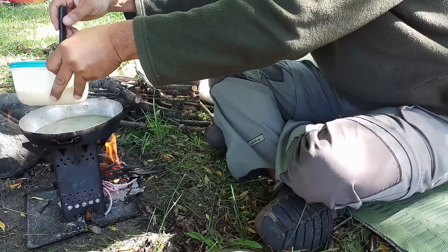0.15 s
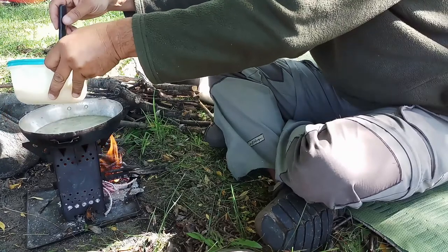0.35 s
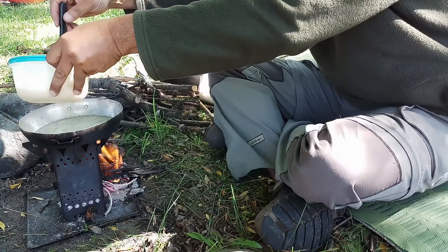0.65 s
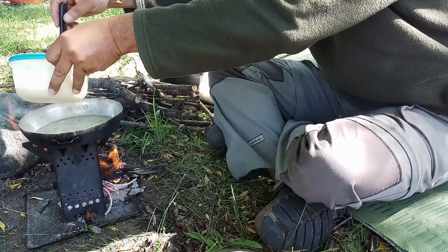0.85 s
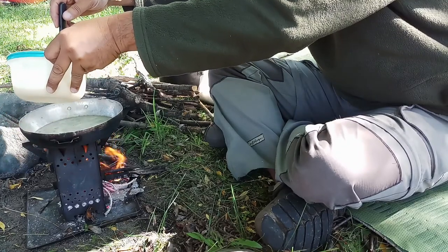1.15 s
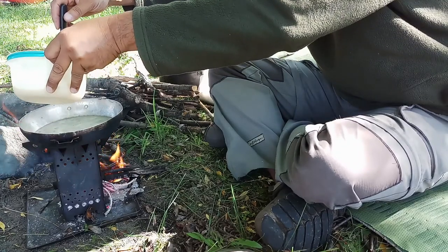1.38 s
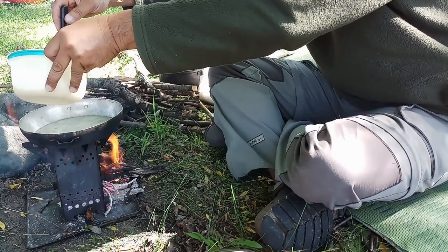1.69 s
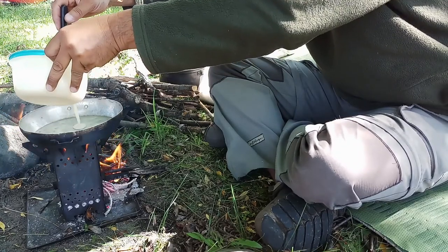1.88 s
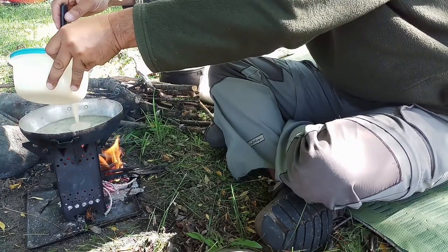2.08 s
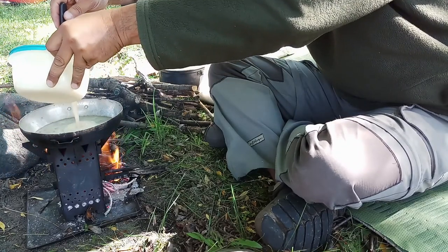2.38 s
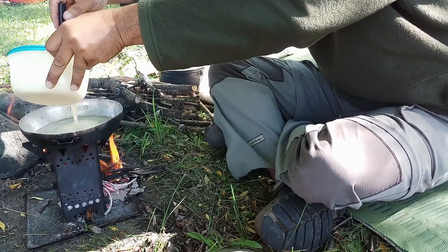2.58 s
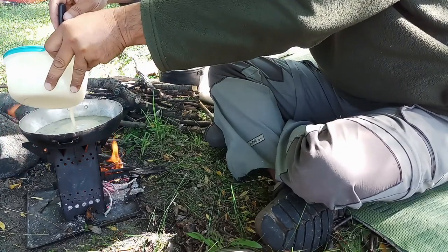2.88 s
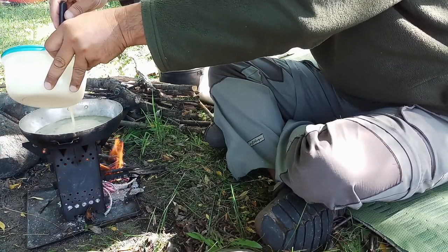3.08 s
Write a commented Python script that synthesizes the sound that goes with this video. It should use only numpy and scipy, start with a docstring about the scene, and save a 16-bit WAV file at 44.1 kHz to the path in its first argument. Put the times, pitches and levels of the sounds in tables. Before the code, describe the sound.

Sizzling batter hits hot oil with a short spit, then fizzes, pops and slowly thins

```python
"""Batter meets hot oil with a short spit, then sizzles: random streams of steam bursts, ringing the pan's modes,
make a dense fizz that thins into separate ticks, over coarser bubbling, louder pops and a low burble.
The pan heats on a small wood stove outdoors, left of the microphones. The fire rushes softly as filtered
noise and its wood snaps twice, as impulses with scattered echoes. Open-air hiss and a faint low drone,
both filtered noise, lie behind."""
import sys
import numpy as np
from scipy import signal
from scipy.fft import rfft, irfft, next_fast_len
from scipy.io import wavfile
from scipy.ndimage import uniform_filter1d, map_coordinates

SR = 44100
rng = np.random.default_rng(int(sys.argv[2]) if len(sys.argv) > 2 else 0)


def master(y):
    """Save y as 16-bit WAV."""
    cut = np.clip(np.atleast_2d(y).T, -1, 1)
    pcm = np.round(cut * 32767)  # scale
    wavfile.write(sys.argv[1], SR, pcm.astype(np.int16))


N = 143325  # samples
T = np.arange(N) / SR  # time of each sample [s]
POUR_S, SPIT_ATTACK_S = 1.819, 0.0048  # batter meets oil; rise time of the spit and sizzle
BURSTS_PER_S = 5000  # densest rate of fine steam bursts in each stream

# spectrum of fine steam bursts: (frequency [Hz], relative level [dB])
FIZZ_COLOUR = [(1200, -19), (3000, -1), (4300, 1), (5200, 1.5), (6200, 0.5), (7200, 2), (7600, 1.5),
               (7950, -6.5), (9000, -2), (11000, -5.5), (12700, -1.5), (14000, -2.5), (15700, -7)]


def amp(db):
    """Level to pressure ratio: 20 dB is a factor of ten."""
    return 10 ** (np.asarray(db) / 20)


def unit(x):
    """Normalise the mean power: scale to rms 1."""
    return x / np.sqrt(np.mean(x ** 2) + 1e-20)


def along(points, hz):
    """Interpolate (frequency, value) points on a logarithmic frequency axis."""
    f, v = np.transpose(points)
    return np.interp(np.log(hz + 1), np.log(f + 1), v)


def curve(rows):
    """Interpolate (time, value) points linearly at every sample."""
    return np.interp(T, *np.transpose(rows))


def wobble(rate):
    """Smooth random modulation: a spline through normal deviates, rate knots a second."""
    knots = rng.standard_normal(N // 100)
    return map_coordinates(knots, [T * rate], mode="wrap")


def filtered(x, response):
    """Linear filtering: multiply the spectrum by a complex response of frequency."""
    m = 2 * next_fast_len(N // 2 + SR // 10)  # zero-padded length
    hz = np.fft.rfftfreq(m, 1 / SR)
    return irfft(rfft(x, m) * response(hz), m)[..., :N]


def coloured(x, colour):
    """Minimum-phase filtering: folding the cepstrum makes the given spectrum causal."""
    def response(hz):
        cepstrum = irfft(np.log(amp(along(colour, hz))))
        n = np.arange(len(cepstrum))
        fold = np.where(n == 0, 1, 2 * (n < len(n) / 2))
        return np.exp(rfft(cepstrum * fold))
    return filtered(x, response)


def decay(start, t60):
    """Exponential decay: jump to 1 at start, then fall 60 dB in t60 seconds."""
    return (T >= start) * amp(-60 * np.maximum(T - start, 0) / t60)


def from_left(x, lead_ms):
    """Interaural-type time difference: the right microphone hears the sound lead_ms later."""
    late = map_coordinates(x, [np.arange(N) - lead_ms * SR / 1000], order=5)
    return np.array([x, late])


def diffuse(colour):
    """Diffuse field: independent mid and side noises set the coherence between microphones."""
    # likeness of left and right: (frequency [Hz], coherence [-1 to 1])
    coherence = [(60, 0.95), (130, 0.94), (290, 0.83), (640, 0.034), (1410, -0.31), (3100, 0.16),
                 (7000, -0.032)]

    def response(hz):
        angle = np.arccos(along(coherence, hz)) / 2
        return amp(along(colour, hz)) * [np.cos(angle), np.sin(angle)]
    mid, side = filtered(rng.standard_normal((2, N)), response)
    return np.array([mid + side, mid - side]) / np.std(mid)


def background(fire_db=1.0, air_db=1, flutter_db=1, lean_db=.5):
    """Broadband turbulence noise: fluttering flames and open-air hiss, with a narrowband drone."""
    # levels before trim, flutter and left lean: (time [s], level [dB])
    fire_level = [(0, -52), (.5, -50), (.8, -54), (1.1, -56), (1.55, -57), (1.85, -53.5), (2.3, -51.5),
                  (2.8, -52), (3.25, -52)]
    air_level = [(0, -54), (.52, -54), (.7, -54.5), (.88, -58), (1.25, -59), (1.63, -59.5), (1.79, -56.5),
                 (3.25, -51.5)]
    drone_level = [(0, -68), (.5, -62.5), (1.1, -74), (1.7, -66), (2.4, -63.5), (3.25, -60)]
    # spectra of flames and open air: (frequency [Hz], relative level [dB])
    fire_colour = [(20, -22), (40, -13.5), (60, -4.5), (100, -7.5), (150, -4), (220, -0.5), (300, -4),
                   (390, 0), (470, 0), (570, 1.5), (720, -4), (1100, -11.5), (3000, -33.5)]
    air_colour = [(200, -34), (600, -12), (900, -3), (1350, -1), (2100, 1.5), (3000, -5.5), (4500, -8),
                  (7300, -10.5), (8100, -19.5), (11000, -24), (15500, -37)]
    drone_hz, drone_width_hz = 70.3, 8.7

    def drone_band(hz):
        return 1 / (1 + (2 * (hz - drone_hz) / drone_width_hz) ** 2)
    fire = diffuse(fire_colour) * amp(curve(fire_level) + fire_db + flutter_db * wobble(18))
    air = diffuse(air_colour) * amp(curve(air_level) + air_db + 0.52 * wobble(25))
    drone = unit(filtered(rng.standard_normal(N), drone_band)) * amp(curve(drone_level))
    return (fire + air + drone) * amp([[lean_db], [-lean_db]])


def snaps(lean_db=1.54, lead_ms=0.18):
    """Impulsive fracture: splitting wood gives a crack, short ring and low thud, then scatters."""
    # snaps of wood: (time [s], level before colour and lean [dB], ring frequency [Hz],
    # ring over crack [dB], thud over crack [dB], trim of the echoes [dB])
    splits = [(0.5538, 3.5, 5070, -9.5, -3, 1.5), (0.6868, -2, 4970, -11.5, 8, 2)]
    # spectrum of a snap and its echoes: (frequency [Hz], level [dB])
    colour = [(60, -18), (250, -7.5), (700, -8), (950, -4.5), (1700, -1), (2700, -6), (3150, 0), (3600, 4),
              (3950, -5.5), (4700, -2.5), (7500, 1.5), (8600, -8), (11000, -9.5), (12600, -6.5),
              (16000, -17)]
    # scatter off stove, ground and surroundings: (delay [s], level before trim [dB], T60 [s])
    echoes = [(.0006, -0.5, 0.012), (.0055, -11.5, 0.031), (0.013, -15.5, .22)]
    ring_t60_s, thud_hz = 0.0045, 1500  # thud: low-pass corner
    out = np.zeros((2, N))
    for s, db, hz, ring_db, thud_db, echo_db in splits:
        sample = round(s * SR)
        start = sample / SR
        crack = 1. * (np.arange(N) == sample)
        ring = amp(ring_db) * decay(start, ring_t60_s) * np.cos(2 * np.pi * hz * (T - start))
        direct = filtered(crack + ring, lambda f: 1 + amp(thud_db) / (1 + 1j * f / thud_hz))
        snap = from_left(direct, lead_ms)
        for delay, level_db, t60 in echoes:
            echo = rng.standard_normal((2, N)) * decay(start + delay, t60)
            # scaled to the energy of a unit impulse
            snap = snap + amp(level_db + echo_db) * echo / np.linalg.norm(echo[0])
        out += amp(db) * snap
    return coloured(out, colour) * amp([[lean_db], [-lean_db]])


def burble(flutter_db=2.5):
    """Slow random modulation of low noise: an uneven burble while batter runs into the pan."""
    # level before flutter: (time [s], level [dB])
    level = [(1.9, -78), (2.3, -59), (2.5, -55.5), (2.65, -62), (2.8, -52.5), (2.95, -58), (3.05, -52.5),
             (3.25, -61)]
    # spectrum: (frequency [Hz], relative level [dB])
    colour = [(30, -25), (70, -7), (130, -0.5), (220, 0), (330, -4), (450, 0), (700, -18), (2000, -50)]
    return diffuse(colour) * amp(curve(level) + flutter_db * wobble(21.92)) * (T > POUR_S)


def bursts(rate):
    """Shot noise: three streams of uneven steam bursts over smooth hiss, at steady mean power."""
    spread_db, steam_share = 3.5, 0.41  # spread of burst sizes; power share of the smooth hiss
    chance = np.clip(rate / SR, 1 / SR, 1)  # of a burst at each sample
    hits = rng.random((3, N)) < chance
    sizes = amp(spread_db * np.clip(rng.standard_normal((3, N)), -2, 2))
    signed = unit(sizes * rng.choice([-1, 1], (3, N)))
    ticks = hits * signed / np.sqrt(chance)
    hiss = rng.standard_normal((3, N))
    return np.sqrt(1 - steam_share) * ticks + np.sqrt(steam_share) * hiss


def patchy(x, depth_db):
    """Time-frequency modulation: bands swell and fade as clusters of bubbles come and go."""
    z = signal.stft(x, nperseg=512)[2]
    field = rng.standard_normal(z.shape[1:])
    field = uniform_filter1d(field, size=5, axis=0)  # smooth over frequency
    field = uniform_filter1d(field, size=7, axis=1)  # smooth over time
    return signal.istft(z * amp(depth_db * unit(field)), nperseg=512)[1][:, :N]


def from_pan(voices, colour, patchy_db=1.23):
    """Modal resonance: bursts ring the damped pan, then arrive directly, off the tub and scattered."""
    # pan modes: (frequency [Hz], width [Hz], level over direct sound before damping [dB])
    modes = [(973, 76, -1), (2860, 39, 5), (3590, 33, 10.5), (6660, 49, -9), (7550, 74, -5)]
    # power share reaching both microphones alike: (frequency [Hz], share [0 to 1])
    direct_share = [(1000, 0.41), (3000, 0.54), (5000, .55), (7300, 0.23), (9000, 0.16), (15000, 0.17)]
    # lead at the left microphone as batter spreads: (time [s], lead [ms])
    lead = [(1.85, 0.18), (2.3, 0.18), (2.68, 0.17), (2.82, 0.17), (3.2, 0.16)]
    batter_damps_db_per_s, lean_db = 25, 1.64
    tub_echo_s, tub_echo_db = .00139, -18.5  # the tub is held over the pan

    def resonance(f):
        return sum(amp(db) * 1j * f * w / (c * c - f * f + 1j * f * w) for c, w, db in modes)

    def tub(hz):
        return 1 + amp(tub_echo_db) * np.exp(-2j * np.pi * hz * tub_echo_s)
    damping = amp(-batter_damps_db_per_s * np.maximum(T - POUR_S, 0))
    voices = voices + filtered(voices, resonance) * damping
    voices = filtered(voices, tub)
    direct = filtered(voices[0], lambda hz: np.sqrt(along(direct_share, hz)))
    scattered = filtered(voices[1:], lambda hz: np.sqrt(1 - along(direct_share, hz)))
    pair = from_left(direct, curve(lead)) + scattered
    return unit(patchy(coloured(pair, colour), patchy_db)) * amp([[lean_db], [-lean_db]])


def spit():
    """Flash boiling: the first batter turns to steam in a quick rise, brief hold and decay."""
    # spectrum: (frequency [Hz], relative level [dB])
    colour = [(400, -25), (1000, -4.5), (1500, -13), (2000, -1.5), (2500, 4.5), (3200, -0.5), (4300, -3.5),
              (5500, 1), (6700, -1), (7600, 3), (8000, -8), (13000, -10), (16000, -12)]
    level_db, hold_s, t60_s = -31.5, 0.0079, 0.12
    rise = np.clip((T - POUR_S) / SPIT_ATTACK_S, 0, 1)
    release = POUR_S + SPIT_ATTACK_S + hold_s
    envelope = rise * ((T < release) + decay(release, t60_s))
    return amp(level_db) * envelope * from_pan(bursts(BURSTS_PER_S), colour)


def pops():
    """Bubble bursting: larger oil bubbles release short, decaying puffs of noise."""
    # louder pops: (time [s], level [dB])
    puffs = [(2.108, -40), (2.223, -34), (2.252, -43), (2.372, -38), (2.66, -37), (2.92, -30.5),
             (2.929, -34), (3.149, -40), (3.2, -40.5), (3.207, -42)]
    t60_s = 0.028
    envelope = sum(amp(db) * decay(s, t60_s) for s, db in puffs)
    return envelope * from_pan(bursts(BURSTS_PER_S), FIZZ_COLOUR)


def sizzle(fizz_db=2, boil_db=1, fizz_flutter_db=0.97, boil_flutter_db=1.67, bubbles_per_s=1500):
    """Shot noise of boiling: fine fizz over coarser bubbling; quieter fizz has fewer bursts."""
    # treble fizz and middle bubbling under the batter, before trim and flutter: (time [s], level [dB])
    fizz_level = [(1.86, -47.5), (1.92, -44), (2.03, -38), (2.15, -38), (2.4, -38), (2.51, -40),
                  (2.65, -37.5), (2.8, -39), (2.9, -42), (3.02, -45.5), (3.12, -49), (3.25, -50.5)]
    boil_level = [(1.86, -50), (2.03, -42), (2.2, -43), (2.38, -43.5), (2.5, -47), (2.8, -47), (3, -49.5),
                  (3.25, -57.5)]
    # spectrum of the bubbling: (frequency [Hz], relative level [dB])
    boil_colour = [(300, -23.5), (700, -5), (1000, 2.5), (1250, -2.5), (1550, 1.5), (2100, -1),
                   (2600, -1.5), (3100, -2), (3600, -11), (4500, -17.5), (8000, -20.5)]
    density_power = 1.1  # burst rate follows fizz power to this exponent
    wet = np.clip((T - POUR_S) / SPIT_ATTACK_S, 0, 1)
    level = curve(fizz_level)
    rate = BURSTS_PER_S * amp(level - level.max()) ** (2 * density_power)
    fizz_gain = amp(level + fizz_db + fizz_flutter_db * wobble(130))
    boil_gain = amp(curve(boil_level) + boil_db + boil_flutter_db * wobble(50))
    fizz = from_pan(bursts(rate), FIZZ_COLOUR) * fizz_gain
    boil = from_pan(bursts(bubbles_per_s), boil_colour) * boil_gain
    return wet * (fizz + boil)


def scene():
    """Superposition: the pressures of fire, surroundings and pan add."""
    return background() + snaps() + burble() + spit() + pops() + sizzle()


def record(dry):
    """Soft saturation and band limiting: round off high peaks, then cut steeply above the band."""
    ceiling, top_hz = 1.0, 15750
    rounded = dry / (1 + (dry / ceiling) ** 4) ** .25
    return filtered(rounded, lambda hz: 1 / np.sqrt(1 + (hz / top_hz) ** 200))


dry = scene()
out = record(dry)
master(out)
```